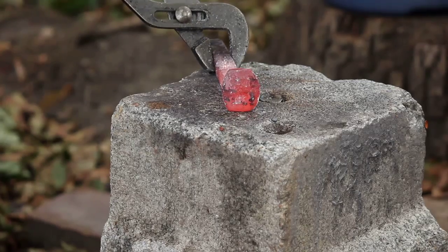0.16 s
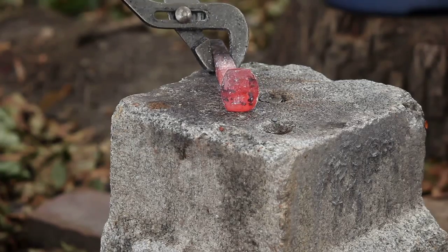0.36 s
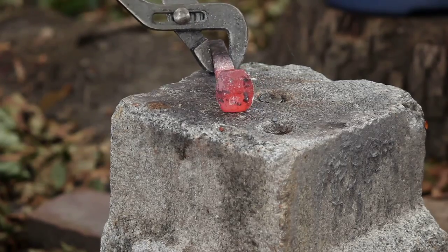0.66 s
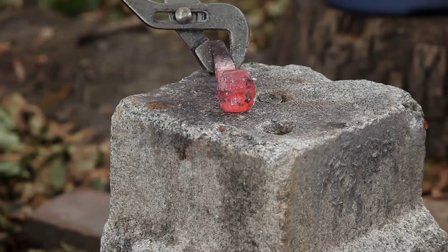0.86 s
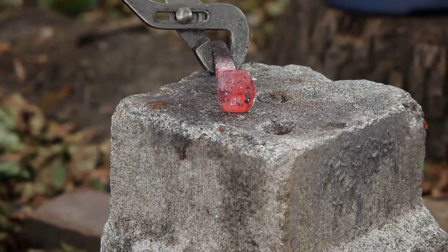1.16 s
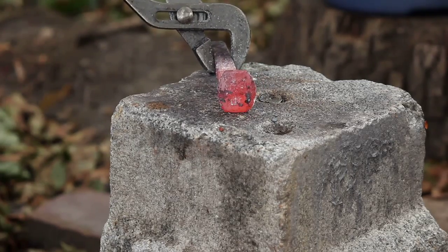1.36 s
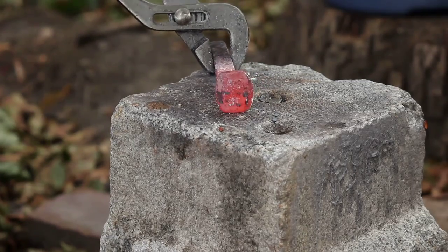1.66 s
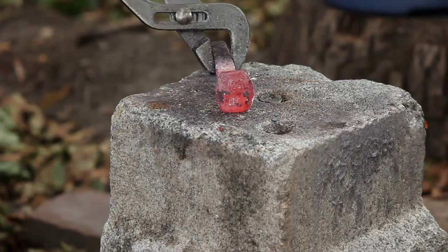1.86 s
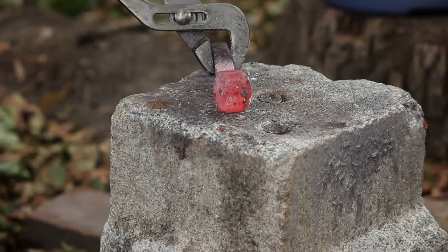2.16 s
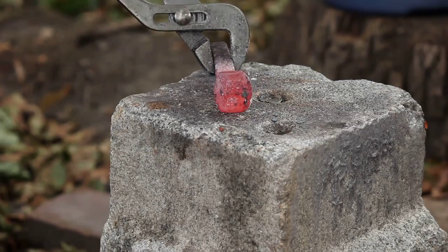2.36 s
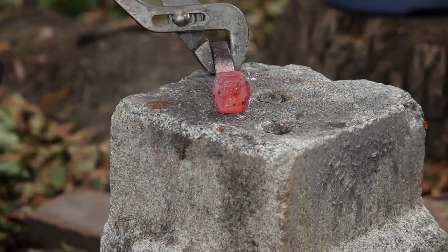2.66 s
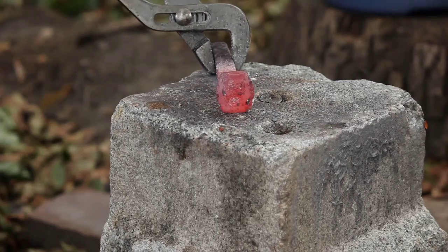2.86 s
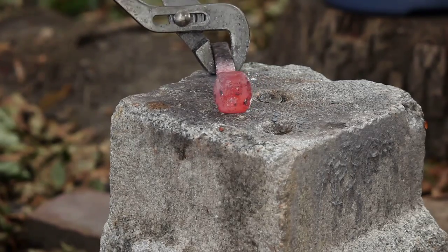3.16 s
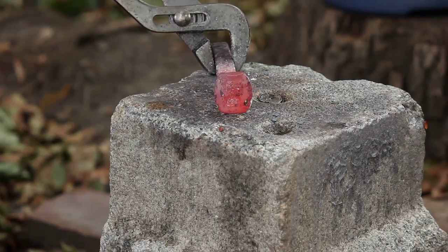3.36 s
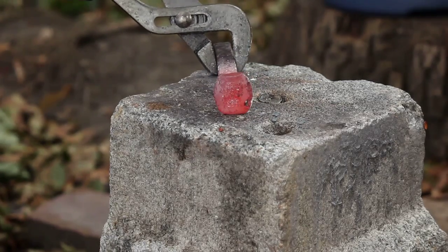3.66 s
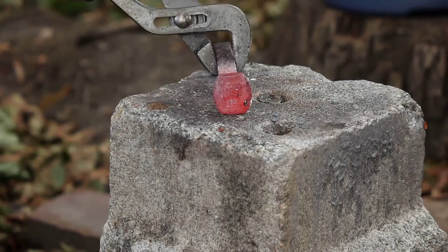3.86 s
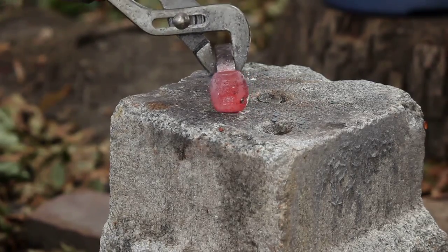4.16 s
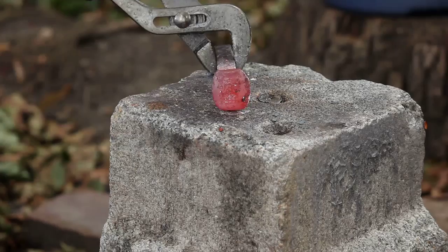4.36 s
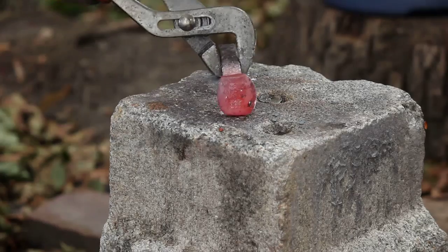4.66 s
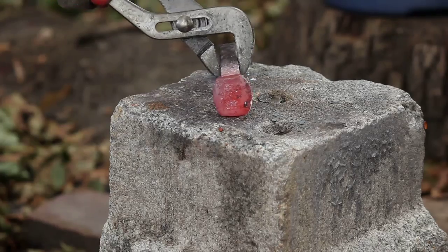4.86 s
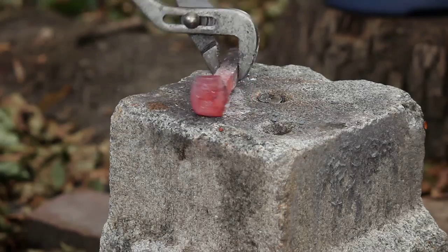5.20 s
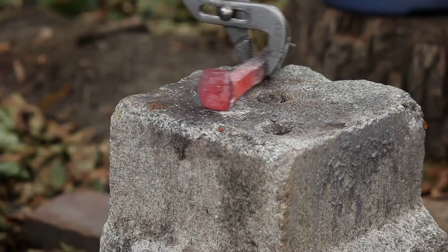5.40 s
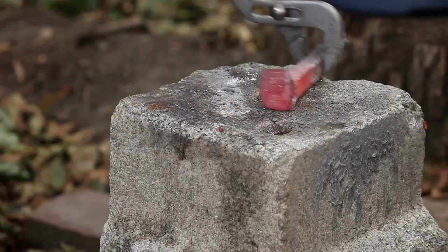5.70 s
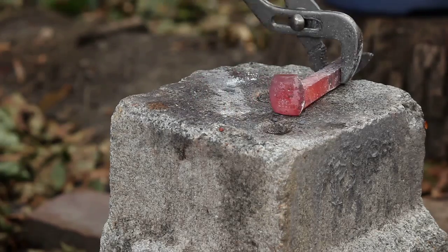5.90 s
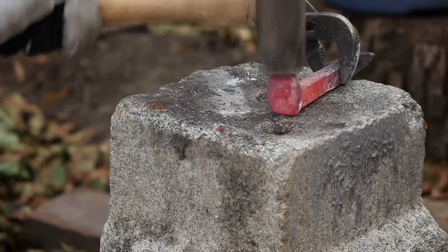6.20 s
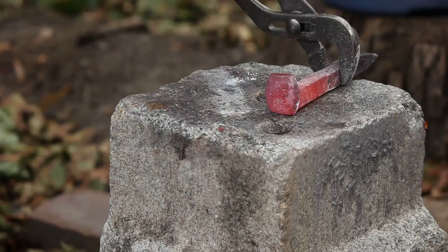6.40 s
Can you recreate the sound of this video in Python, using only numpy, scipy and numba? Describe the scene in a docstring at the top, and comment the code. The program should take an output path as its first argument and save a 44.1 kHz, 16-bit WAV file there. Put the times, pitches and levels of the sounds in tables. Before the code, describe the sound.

Ten hard, dry hammer blows ring briefly in a yard over steady burner roar, then wind thumps and one faint last tap.

```python
"""A hand hammer forges hot iron on a stone block outdoors, before one microphone.
Throughout, filtered noise and wavering sines make a gas burner roar, hiss and whistle; wind buffets.
Noise-burst ticks of a loose pliers joint start just before the first blow. Ten blows follow about 0.5 s
apart, each a noise crack with damped modes of iron, stone and steel, wall echoes and a yard tail.
Gain drops after blows, and their first cycles clip. Strong eddies lead up to a last, weak blow."""
import sys
import numpy as np
from scipy import signal
from scipy.fft import rfft, irfft, next_fast_len
from scipy.io import wavfile
from scipy.ndimage import map_coordinates
from numba import njit

SR = 44100
rng = np.random.default_rng(int(sys.argv[2]) if len(sys.argv) > 2 else 0)


def persist_wave(psi):
    """Save psi, clipped to +-1, as 16-bit WAV."""
    counts = np.round(np.clip(psi, -1, 1) * 32767).astype(np.int16)
    wavfile.write(sys.argv[1], SR, np.atleast_2d(counts).T)


def invert_db(x):
    """Field ratio 10**(x/20) for x, a level in decibels (scalar or array-like)."""
    u = np.asarray(x, float) / 20
    return 10 ** u


N = 288414

# burner roar level: start_s, level_db
ROAR_LEVEL = [(0, -38.5), (.7, -33), (1.4, -32.5), (2.1, -32.5), (2.8, -32.5), (3.5, -35.5), (4.2, -34),
              (4.9, -34), (5.6, -32), (6.54, -34.5)]
# burner spectra: pitch_hz, density_db (per Hz, relative)
ROAR_SPECTRUM = [(88, -1), (150, -4.5), (344, -4.5), (599, -3), (648, 0), (810, -4.5), (1110, -4.5),
                 (1510, -6.5), (1700, -3), (1830, -6), (2300, -8), (2480, -11), (3500, -46), (4550, -88),
                 (7700, -120)]
HISS_SPECTRUM = [(1500, -15), (2600, -2), (3740, -4), (6210, -7.5), (10500, -11), (12500, -9), (15850, -14),
                 (16000, -59)]
# burner whistles: pitch_hz, level_db (peak against roar rms)
WHISTLES = [(1113, -11), (1750, -11), (2228, -13)]
# wind buffeting level: start_s, level_db
BUFFET_LEVEL = [(0, -58), (.6, -62), (1.05, -62), (1.27, -38.5), (1.7, -52), (2.15, -38), (2.9, -33.5),
                (3.1, -63), (3.4, -34.5), (3.72, -48), (4.25, -28.5), (4.45, -97), (4.75, -34.5),
                (5.25, -51), (5.5, -39), (5.95, -34), (6.14, -25.5), (6.54, -56)]
# wind buffeting spectrum: pitch_hz, density_db (per Hz, relative)
BUFFET_SPECTRUM = [(12, -54), (20, -4.5), (125, -5), (158, -15), (189, -14), (428, -16.5), (490, -14),
                   (700, -30), (910, -55), (1540, -120)]
# strongest eddies: centre_s, peak_db, pitch_hz
STRONG_EDDIES = [(1.975, -23, 168), (2.181, -12.5, 143), (2.436, -11.5, 95), (2.456, -22, 121),
                 (2.498, -16.5, 130), (2.68, -17.5, 159), (2.745, -14, 119), (2.777, -20, 109),
                 (2.824, -14, 141), (2.855, -20, 148), (3.509, -23, 135), (3.818, -22, 164),
                 (3.895, -22.5, 139), (4.19, -16.5, 162), (5.338, -19, 100), (5.488, -21.5, 128),
                 (5.647, -17.5, 138), (6.037, -14, 152), (6.062, -6, 126), (6.128, -14, 147),
                 (6.185, -11, 163), (6.207, -10, 120), (6.24, -16, 192)]
# ticks of the loose pliers joint: start_s, level_db
PLIERS_TICKS = [(0.3495, -26), (0.8192, -25), (2.2608, -30), (2.2844, -33), (2.3006, -18.5), (2.4049, -32),
                (2.4892, -27), (2.774, -11.5), (4.942, -26), (4.9806, -32), (4.998, -29), (5.492, -11)]
# tick spectrum: pitch_hz, density_db (per Hz, relative)
TICK_SPECTRUM = [(1500, -25), (4000, -3), (8000, 12.5), (12000, 18), (16000, 5), (16800, -40)]
# single wall echoes: delay_s, level_db, centre_hz, width_hz
WALL_ECHOES = [(.0095, -13, 2160, 2500), (0.0237, -7.5, 2300, 1990), (.046, -14, 1408, 900)]
# scattered yard echo, decay by band: pitch_hz, t60_s
YARD_DECAY = [(300, 0.067), (1000, 0.12), (3000, 0.42), (7000, 0.34), (14000, 0.34)]
# scattered yard echo, tone: pitch_hz, level_db
YARD_SPECTRUM = [(300, 6), (1000, 10), (3000, -4), (7000, 1), (14000, -7), (15800, -36), (16200, -56)]
# blows: start_s, crack_db, then against the crack: stone_db, piece_db, head_high_db
HAMMER_BLOWS = [(0.4765, -1.5, 2, -4, -1.5), (0.9819, 2.5, -0.5, -7, -3), (1.483, 1.5, 2.5, -10.5, -12),
                (2.004, 5, -16, -11, 4), (2.5189, 3.5, -2, -2.5, -15), (3.0352, 4, -4, -7.5, 0.5),
                (3.529, 5.5, -4, -8, -4), (4.0474, 6, -3, -5.5, -51), (4.5401, 5, -22, -8.5, 5),
                (5.0447, 5, -13, -8, 4), (6.1789, -16, 2, 1, -18)]
# crack spectrum: pitch_hz, density_db (per Hz, relative)
CRACK_SPECTRUM = [(200, -23), (600, 7.5), (2000, 2.5), (5000, 2.5), (8000, 2), (12000, 8), (16000, -37)]
# damped modes of stone, work piece, pliers jaws and hammer head: pitch_hz, level_db, t60_s, rise_s
STONE_MODES = [(277, -13, 0.021, 0.0019), (550, -13, 0.021, 0.0013), (891, 4.5, 0.017, 0.0016),
               (1348, -2, 0.014, 0.0017)]
PIECE_MODES = [(2010, 6.6, 0.011, 0.00078), (2393, 5, 0.023, 0.00052)]
JAW_MODES = [(3100, -6, .01, .0005), (3800, -4, .025, .0005), (4600, -2, .01, .0003),
             (5200, 0, .012, .0003), (5650, -15, .06, .0003)]
HEAD_LOW_MODES = [(11250, -17, .09, .0002), (11750, 0, .03, .0002)]
HEAD_HIGH_MODES = [(14050, 0, .026, .0002)]
# phase wander of stone, piece, jaws, head low, head high (cycles per root second)
PHASE_WANDER = (3, 4, 7, 2.5, 2.5)


def unit(x):
    """Scaled to rms 1."""
    return x / np.sqrt(np.mean(x ** 2) + 1e-20)


def curve(rows):
    """(s, value) rows interpolated to one value per sample."""
    s, value = np.transpose(rows)
    return np.interp(np.arange(N) / SR, s, value)


def along(points, hz):
    """(Hz, value) points on a log frequency axis."""
    f, v = np.transpose(points)
    return np.interp(np.log(hz + 1), np.log(f + 1), v)


def wobble(rate_hz):
    """Smooth random curve with rate_hz knots a second."""
    knots = rng.standard_normal(int(N * rate_hz / SR) + 4)
    return map_coordinates(knots, [np.arange(N) * rate_hz / SR])


def filtered(x, response):
    """x times a complex response of frequency."""
    m = next_fast_len(len(x) + 8192)
    return irfft(rfft(x, m) * response(np.fft.rfftfreq(m, 1 / SR)), m)[:len(x)]


def noise(n, spectrum):
    """Coloured noise of rms 1."""
    return unit(filtered(rng.standard_normal(n), lambda hz: invert_db(along(spectrum, hz))))


def wind():
    """Lumpy buffeting, and single eddies that thump the diaphragm for a cycle or two."""
    weak_count, above_buffet_db, spread_db = 60, 13, 5.5
    lowest_hz, range_octaves = 110, 0.61
    buffet_db = curve(BUFFET_LEVEL)

    when, drop, pitch = rng.random((weak_count, 3)).T
    weak_db = buffet_db[(when * N).astype(int)] + above_buffet_db - spread_db * drop
    weak_hz = lowest_hz * 2 ** (range_octaves * pitch)
    eddies = np.r_[STRONG_EDDIES, np.c_[when * N / SR, weak_db, weak_hz]]

    half = SR // 25
    t = np.arange(-half, half) / SR
    thumps = np.zeros(N + 2 * half)
    for (s, db, hz), (phase, span) in zip(eddies, rng.random((len(eddies), 2))):
        cycles = .4 + .35 * span
        envelope = invert_db(db) * np.exp(-(t * hz / cycles) ** 2)
        thumps[round(s * SR):][:len(t)] += envelope * np.cos(2 * np.pi * (hz * t + phase))

    buffeting = unit(invert_db(2.2 * wobble(41)) * noise(N, BUFFET_SPECTRUM))
    return thumps[half:N + half] + invert_db(buffet_db) * buffeting


def burner():
    """Gas turbulence: an unsteady roar with thin wavering whistles, under a smooth hiss."""
    hiss_db, hiss_follow_db_per_db = -2, 0.73  # hiss against the mean roar
    roar_db = curve(ROAR_LEVEL)
    mean_db = roar_db.mean()
    hiss_level_db = mean_db + hiss_db + hiss_follow_db_per_db * (roar_db - mean_db)

    t = np.arange(N) / SR
    whistle = np.zeros(N)
    for hz, db in WHISTLES:
        level = invert_db(db + 1.5 * wobble(8))
        whistle += level * np.sin(2 * np.pi * hz * t + .8 * wobble(12))

    roar = invert_db(roar_db + .7 * wobble(11)) * (noise(N, ROAR_SPECTRUM) + whistle)
    hiss = invert_db(hiss_level_db + .6 * wobble(7)) * noise(N, HISS_SPECTRUM)
    return roar + hiss


def pliers():
    """Loose joint, steel on steel: thin bright ticks of decaying noise."""
    t60_s = 0.0099
    out, t = np.zeros(N + SR), np.arange(SR // 10) / SR
    for s, db in PLIERS_TICKS:
        out[round(s * SR):][:len(t)] += invert_db(db - 60 * t / t60_s) * noise(len(t), TICK_SPECTRUM)
    return out[:N]


def ring(modes, t, spread_db, wander):
    """Damped modes at new strengths; grinding contact makes their phases wander."""
    out = np.zeros(len(t))
    for hz, db, t60_s, rise_s in modes:
        envelope = invert_db(db + spread_db * rng.normal() - 60 * t / t60_s) * (1 - np.exp(-t / rise_s))
        drift = rng.random() + wander * np.cumsum(rng.standard_normal(len(t))) * np.sqrt(1 / SR)
        out += envelope * np.sin(2 * np.pi * (hz * t + drift))
    return out


def wall(x, delay_s, centre_hz, width_hz):
    """One reflection: delayed and band-passed."""
    def response(hz):
        band = 1j * hz * width_hz / (centre_hz ** 2 - hz ** 2 + 1j * hz * width_hz)
        return band * np.exp(-2j * np.pi * hz * delay_s)
    return filtered(x, response)


def yard_tail(n):
    """Scattered echo: noise of unit energy that swells and dies by band."""
    swell_s = 0.042
    hz, t, z = signal.stft(rng.standard_normal(n), SR, nperseg=256)
    level_db = along(YARD_SPECTRUM, hz)[:, None] - 60 * t / along(YARD_DECAY, hz)[:, None]
    shape = invert_db(level_db) * (1 - np.exp(-t / swell_s))
    tail = signal.istft(z * shape, SR, nperseg=256)[1]
    return tail / np.linalg.norm(tail)


def echoes(crack, tones):
    """Direct sound, three wall copies with tones reduced, and a yard tail mostly of the crack."""
    wall_tones_db, yard_db, smear_db = -6, -8.5, -25
    out = crack + tones
    to_walls = crack + invert_db(wall_tones_db) * tones
    for delay_s, db, centre_hz, width_hz in WALL_ECHOES:
        out = out + invert_db(db) * wall(to_walls, delay_s, centre_hz, width_hz)
    tail = yard_tail(len(crack))
    spray = np.linalg.norm(crack) * tail[:len(crack)]  # the short crack excites every frequency alike
    smear = signal.fftconvolve(tones, tail)[:len(crack)]
    return out + invert_db(yard_db) * spray + invert_db(smear_db) * smear


def hammer():
    """A short crack of contact, then head, pliers jaws, work piece and stone ring out."""
    # harder jolts on the stone rattle the jaws more
    jaws_db, jaws_follow_db_per_db = -3.5, 0.43
    # square blows that reach the stone also ring the head's low pair; soft blows hardly do
    head_low_db, head_follow_db_per_db = -1.5, 0.21
    soft_db, soft_dulls_db_per_db = 2, 2.2
    bodies = STONE_MODES, PIECE_MODES, JAW_MODES, HEAD_LOW_MODES, HEAD_HIGH_MODES

    out, t = np.zeros(N + SR), np.arange(SR // 2) / SR
    snap = invert_db(-60 * t / 0.0035)
    chatter = invert_db(-14 - 60 * t / 0.039) + invert_db(-22 - 60 * t / 0.14)  # iron on rough stone
    crack_envelope = (snap + chatter) * (1 - np.exp(-t / .00015))

    for s, db, stone_db, piece_db, high_db in HAMMER_BLOWS:
        rattle_db = jaws_db + jaws_follow_db_per_db * stone_db
        low_db = head_low_db + head_follow_db_per_db * stone_db
        low_db += soft_dulls_db_per_db * min(db - soft_db, 0)
        levels_db = stone_db, piece_db, rattle_db, low_db, high_db

        crack = crack_envelope * noise(len(t), CRACK_SPECTRUM)
        tones = np.zeros(len(t))
        for modes, wander, level_db in zip(bodies, PHASE_WANDER, levels_db):
            tones += invert_db(level_db) * ring(modes, t, spread_db=3.5, wander=wander)
        out[round(s * SR):][:len(t)] += invert_db(db) * echoes(crack, tones)
    return out[:N]


def scene():
    """One microphone feeds both channels."""
    return np.tile(wind() + burner() + pliers() + hammer(), (2, 1))


@njit
def ducking(over_db, start_db, grab, hold, release, creep, recover):
    """Gain cut in dB: a quick stage follows the held peak; a slow stage builds up over many blows."""
    cut = np.zeros(len(over_db))
    held, quick, slow, wait = start_db, start_db, 0., .5 * hold
    for i in range(len(over_db)):
        if over_db[i] > held:
            held, wait = over_db[i], hold
        elif wait > 0:
            wait -= 1
        else:
            held -= release * held
        quick += grab * (held - quick)
        slow += creep * quick - recover * slow
        cut[i] = quick + slow
    return cut


def gain_control(x):
    """Cuts gain after peaks, most keenly treble ones; starts low from an earlier blow."""
    threshold_db, cut_db_per_db = -4, 0.53
    grab_s, hold_s, release_s = 0.0019, .13, .13
    sensed = filtered(x[0], lambda hz: .3 + (hz / 9000) ** 3 * (hz < 15000))
    over_db = cut_db_per_db * (20 * np.log10(np.abs(sensed) + 1e-9) - threshold_db)
    cut_db = ducking(over_db, start_db=1.5, grab=1 / (grab_s * SR), hold=hold_s * SR,
                     release=1 / (release_s * SR), creep=1.2 / SR, recover=1.3 / SR)
    return x * invert_db(-cut_db)


def overload(x):
    """Smooth saturation towards 0.9 of full scale."""
    return x / (1 + np.abs(x / .9) ** 4) ** (1 / 4)


def bass_cut(x):
    """Two first-order high-passes at 32 Hz."""
    return np.array([filtered(side, lambda hz: (hz / (hz - 1j * 32)) ** 2) for side in x])


def roll_off(x):
    """The treble ends steeply here."""
    return signal.sosfilt(signal.butter(12, 16820, fs=SR, output="sos"), x)


def record(dry):
    """Gain control lags the blows, so their first cycles overload; then a bass cut."""
    mix = bass_cut(overload(gain_control(dry)))
    return roll_off(mix)


dry = scene()
out = record(dry)
persist_wave(out)
```